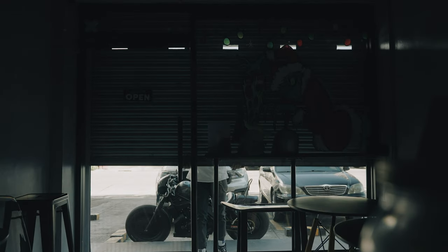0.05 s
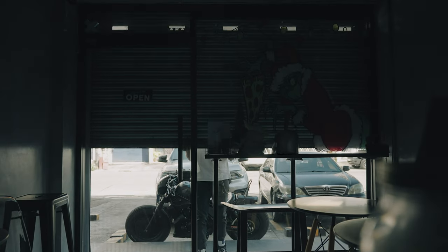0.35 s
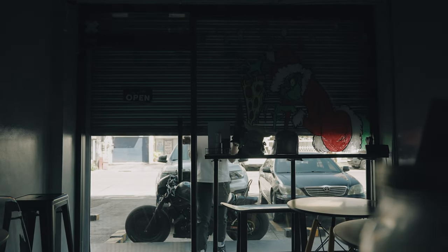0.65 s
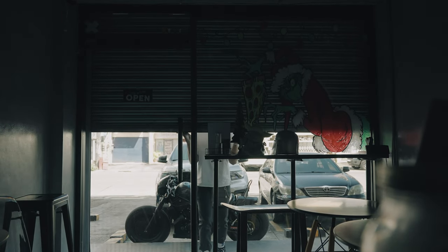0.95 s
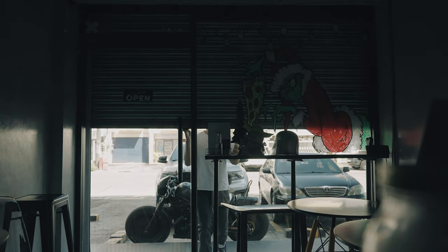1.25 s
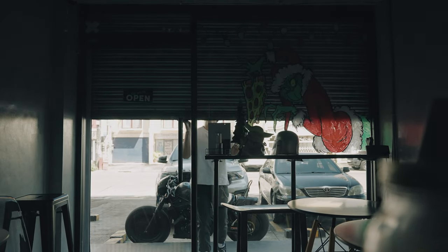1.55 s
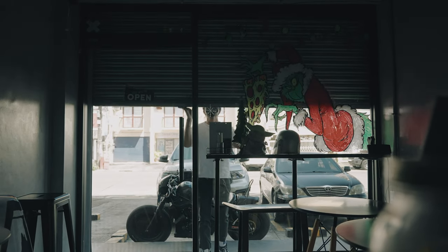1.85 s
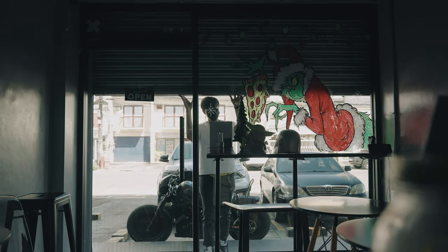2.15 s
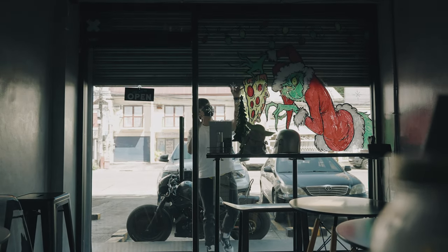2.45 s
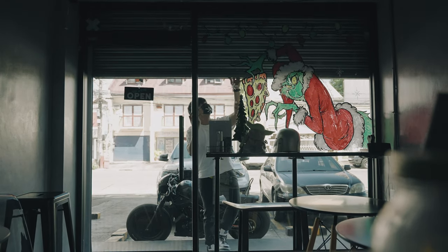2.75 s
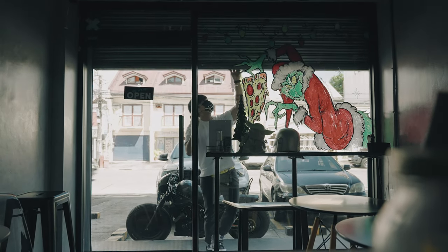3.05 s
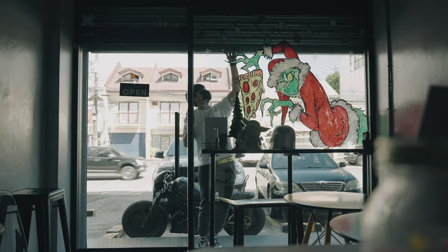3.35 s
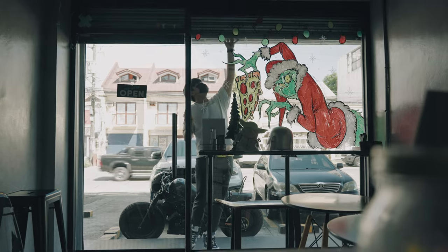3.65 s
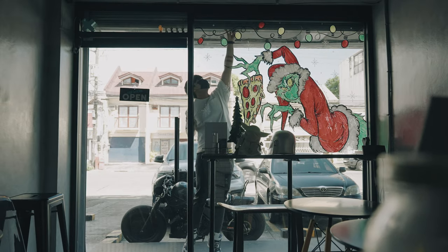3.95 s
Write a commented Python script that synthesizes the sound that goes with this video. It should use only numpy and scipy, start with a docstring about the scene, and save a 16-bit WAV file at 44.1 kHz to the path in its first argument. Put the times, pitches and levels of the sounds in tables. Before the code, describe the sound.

A metal roller shutter rises with a loud rattle, quietens, then clatters upward again in several shoves, scraping in its rails with low thumps and short squeaks. The small shop adds a short echo, and distant traffic hums faintly.

```python
"""A steel roller shutter is pushed up in surges, heard from inside a small hard-walled shop.
Its loose slats chatter and ring in dense tiny contacts and clash when jolted; their ends
scrape and squeak in the guide rails. For low end, the drum rumbles and the curtain drones
and thumps as it flexes. Behind it all sits a faint bed of street traffic and engine hum."""
import sys
import numpy as np
from scipy import signal
from scipy.fft import rfft, irfft, next_fast_len
from scipy.io import wavfile
from scipy.ndimage import map_coordinates

SR = 44100
rng = np.random.default_rng(int(sys.argv[2]) if len(sys.argv) > 2 else 0)


def master_out(mix):
    """Clip the mix to full scale and print it as 16-bit PCM to the path in sys.argv[1]."""
    frames = np.transpose(np.atleast_2d(mix))
    ceiling = np.clip(frames, -1, 1)
    pcm = np.round(ceiling * 32767).astype(np.int16)
    wavfile.write(sys.argv[1], SR, pcm)


N = 176400

# surges of the push, ahead of the trims (t/s, level/dB, scrape offset/dB)
PUSH_ENVELOPE = [(0.0, -24.5, 1), (0.17, -27.5, -9), (0.22, -25, -2.5), (0.6, -27.5, -7.5),
                 (0.75, -36.5, -22), (0.82, -33.5, -5), (1.1, -35, -11), (1.25, -44, -29), (1.32, -48, -12),
                 (1.46, -39, -13), (1.51, -42.5, -22), (1.57, -37.5, -7), (1.68, -34.5, -15),
                 (1.71, -39.5, -9), (1.84, -31.5, -5), (1.88, -25.5, -5), (1.96, -25.5, -7),
                 (2.07, -26, -4), (2.23, -29.5, -10.5), (2.38, -33, -4.5), (2.48, -26.5, -9),
                 (2.63, -30.5, -7.5), (2.75, -41.5, -25), (2.99, -33.5, -13), (3.23, -36, -10),
                 (3.26, -40.5, -13), (3.29, -31, -6), (3.44, -30.5, -12), (3.56, -38.5, -21),
                 (3.6, -32.5, -9), (3.72, -37.5, -23), (3.75, -34.5, -12), (3.94, -46, -18),
                 (4.0, -37.5, -4)]
# swell of the rumble, ahead of its trim (t/s, level/dB)
RUMBLE_ENVELOPE = [(0.0, -23.5), (0.32, -27.5), (0.37, -21.5), (0.49, -32), (0.53, -26.5), (0.71, -39.5),
                   (1.06, -35.5), (1.26, -43), (1.6, -32.5), (1.75, -38), (1.85, -36), (1.89, -25.5),
                   (2.07, -27), (2.09, -32.5), (2.19, -29.5), (2.25, -34.5), (2.35, -34), (2.38, -37),
                   (2.53, -29), (2.75, -43), (2.87, -35.5), (3.12, -36), (3.13, -33), (3.17, -38),
                   (3.42, -30), (3.49, -35.5), (3.69, -32), (3.95, -39.5), (3.98, -32), (4.0, -36)]
# jolts through the slats, ahead of their trim (t/s, level/dB, treble tilt/dB per octave)
CLASH_CUES = [(.005, -29, -3), (.185, -30.5, 9), (.222, -26.5, -2), (.34, -28.5, 2.5), (.765, -39.5, 0.5),
              (.815, -37.5, 1), (1.376, -46, -5), (1.533, -46.5, 7), (1.575, -38, -2), (1.732, -41, 6),
              (1.84, -29, 1), (1.875, -25, -0.5), (2.039, -26.5, -0.5), (2.44, -34, -4), (2.79, -35.5, -2),
              (2.934, -33, -0.5), (2.99, -33.5, -0.5), (3.11, -32.5, -1.5), (3.281, -24.5, -3),
              (3.305, -34, 2), (3.395, -33, 1), (3.415, -33, -1), (3.585, -40.5, 5), (3.74, -46, -1),
              (3.963, -43, 1)]
# slat ends sticking in the rails (t/s, length/s, f/Hz, level/dB, pitch jitter/ratio, octave level/dB)
SQUEAK_CUES = [(0.445, 0.056, 6500, -34, 0.021, -8), (1.996, 0.12, 8260, -40, .012, -25),
               (3.19, 0.047, 6140, -41.5, .01, -10), (3.736, 0.06, 5250, -44, .04, -5)]
# flexes of the curtain (t/s, level/dB)
THUMP_CUES = [(.345, -25), (1.389, -30), (1.575, -30), (1.885, -30), (2.509, -29), (3.13, -31.5),
              (3.965, -34)]
# engines in the street (start/s, end/s, f/Hz, level/dB)
ENGINE_CUES = [(0.898, 1.55, 73, -52.5), (2.943, 3.85, 53.8, -52)]

# tone colour of each layer (f/Hz, level/dB)
RATTLE_EQ = [(150, -22), (330, -2), (500, -0.5), (900, -2.5), (1350, -0.5), (2100, 1), (3000, -2),
             (4300, -11.5), (7000, -13.5), (15500, -32)]
SCRAPE_EQ = [(1500, -40), (3500, -0.5), (4700, -4), (6300, -3), (8500, -8), (11000, -7.5), (15500, -17)]
CLASH_EQ = [(100, -25), (400, -16), (1000, -6.5), (2100, -4.5), (3300, -8), (4600, -12.5), (6500, -11.5),
            (10000, -17.5), (15500, -26)]
DRUM_EQ = [(25, -42), (60, -20), (90, -14.5), (122, -1.5), (200, -0.5), (300, -1.5), (380, -6.5),
           (520, -13.5), (1000, -31), (3000, -70)]
THUMP_EQ = [(30, -45), (80, -10), (125, -3.5), (250, -0.5), (400, -17), (1000, -50), (3000, -80)]
STREET_EQ = [(20, -16), (60, 0), (150, -7), (400, -6.5), (1500, -3), (5000, -52), (15000, -65)]
# metallic ring of the slats (f/Hz, width/Hz, level/dB)
SLAT_MODES = [(678, 18, -14), (746, 33, -3.5), (1199, 26, 1.5), (1374, 11, 2), (1756, 20, -1.5),
              (1817, 52, -1.5), (1982, 58, 4.5), (2407, 61, 1), (2789, 28, -8), (3580, 71, -6)]
# low resonances of the curtain (f/Hz, width/Hz, level/dB)
CURTAIN_MODES = [(203, 18.4, -10.5), (253, 10.4, -2.5), (278.7, 31.5, -4), (433.8, 21, -13.5)]

# reverb time of the shop (f/Hz, T60/s)
SHOP_DECAY = [(150, 0.53), (1000, 0.4), (4000, 0.46), (12000, 0.26)]
# likeness of left and right (f/Hz, likeness/ratio: 0 is wide, 1 and above is mono)
STEREO_LIKENESS = [(60, 4.3), (125, 1.9), (250, 1.2), (500, 0.76), (1000, 0.71), (2000, 0.26),
                   (12000, 0.01)]
# stereo balance (f/Hz, left minus right/dB)
STEREO_BALANCE = [(200, 0), (1500, -0.39), (4000, -0.64), (8000, -2.5), (12000, -0.39)]

RATTLE_TRIM_DB, SCRAPE_TRIM_DB, CLASH_TRIM_DB, RUMBLE_TRIM_DB = 1.5, -1.5, 3, -2.5
RATTLE_PER_S, SCRAPE_PER_S, CLASH_PER_S = 2000, 1700, 3400  # contact density
RING_DB, DRONE_DB, STREET_DB = -7, -37, -44.5
DRONE_FOLLOW = 0.77  # dB of drone per dB of rumble
CLASH_ATTACK_S, CLASH_T60_S = 0.0015, 0.26
SQUEAK_EDGE_S, SQUEAK_FADE_DB = 0.0022, 0.5
THUMP_ATTACK_S, THUMP_T60_S = 0.0098, 0.23
LEFT_LAG_S, HIGH_CUT_HZ = 3.6 / SR, 15800


def rattle():
    """Loose slats chatter against each other and ring."""
    taps = shop_reverb(contacts(RATTLE_PER_S, spread_db=3.5), direct_db=-3.5, spots=8)
    chatter = stereo(taps, eq(RATTLE_EQ))
    ring = stereo(contacts(RATTLE_PER_S, spread_db=0), resonances(SLAT_MODES))
    return chatter + amp(RING_DB) * ring


def scrape():
    """Slat ends grate along the guide rails in fine, bright ticks."""
    ticks = shop_reverb(contacts(SCRAPE_PER_S, spread_db=3.5), direct_db=-7.5, spots=8)
    return stereo(ticks, eq(SCRAPE_EQ))


def clashes():
    """Each jolt runs through the slats as a dying burst of contacts."""
    out, t = np.zeros((2, N)), np.arange(SR // 2) / SR
    for start, db, tilt_db in CLASH_CUES:
        colour = lambda hz: amp(at_hz(CLASH_EQ, hz) + tilt_db * np.log2(hz / 1000 + 1))
        burst = stereo(contacts(CLASH_PER_S, spread_db=2.5, size=len(t)), colour)
        envelope = hit_envelope(t, CLASH_ATTACK_S, CLASH_T60_S)
        add(out, start, amp(db + CLASH_TRIM_DB) * envelope * burst)
    return shop_reverb(out, direct_db=2.5, spots=1)


def squeaks():
    """Steel sticks and slips on steel: a short, unsteady whistle with its octave."""
    out = np.zeros((2, N))
    for start, length, hz, db, jitter, octave_db in SQUEAK_CUES:
        t = np.arange(int(length * SR)) / SR
        phase = wavering_phase(hz, len(t), depth=jitter, turns_per_s=890)
        tone = np.sqrt(2) * (np.sin(phase) + amp(octave_db) * np.sin(2 * phase))
        edges = np.minimum(1, np.minimum(t, length - t) / SQUEAK_EDGE_S)
        add(out, start, amp(db - SQUEAK_FADE_DB * t / length) * edges * tone)
    return shop_reverb(out, direct_db=-1, spots=1)


def rumble():
    """The drum rolls, and the curtain drones in its resonances with gentler swells."""
    level_db, = automation(RUMBLE_ENVELOPE)
    drone = stereo(rng.standard_normal((2, N)), resonances(CURTAIN_MODES))
    drone_db = DRONE_DB + DRONE_FOLLOW * (level_db - level_db.mean())
    return amp(level_db + RUMBLE_TRIM_DB) * noise(DRUM_EQ) + amp(drone_db) * drone


def thumps():
    """The whole curtain flexes with a low boom."""
    out, t = np.zeros((2, N)), np.arange(SR // 2) / SR
    envelope = hit_envelope(t, THUMP_ATTACK_S, THUMP_T60_S)
    for start, db in THUMP_CUES:
        add(out, start, amp(db) * envelope * noise(THUMP_EQ, size=len(t)))
    return out


def street():
    """A bed of distant traffic, with engine notes that swell and fade."""
    out = amp(STREET_DB) * noise(STREET_EQ)
    for start, end, hz, db in ENGINE_CUES:
        size = int((end - start) * SR)
        hum = np.sqrt(2) * np.sin(wavering_phase(hz, size, depth=0.026, turns_per_s=11.5))
        add(out, start, amp(db) * signal.windows.tukey(size, 0.5) * hum)
    return out


def shop_reverb(x, direct_db, spots):
    """Direct sound plus reverb; x is scattered over spots on the curtain, each with its own tail."""
    spot = rng.integers(spots, size=N)
    wet = sum(signal.fftconvolve(x * (spot == k), shop_tail(), axes=1)[:, :N] for k in range(spots))
    return (amp(direct_db) * x + wet) / np.hypot(1, amp(direct_db))


def shop_tail():
    """The hard walls answer with a short, diffuse tail whose top end dies first."""
    hz, t, spectrum = signal.stft(rng.standard_normal((2, SR // 2)), SR, nperseg=256)
    decay = amp(-60 * t / at_hz(SHOP_DECAY, hz)[:, None])
    tail = signal.istft(spectrum * decay, SR, nperseg=256)[1]
    return tail / np.linalg.norm(tail[0])


def contacts(per_s, spread_db, size=N):
    """Tiny impacts at random moments, with random polarity in each of two channels."""
    hits = rng.random(size) < per_s / SR
    strength = amp(spread_db * np.clip(rng.standard_normal(size), -2, 2))
    return hits * strength * rng.choice([-1, 1], (2, size))


def noise(colour, size=N):
    """Stereo noise shaped by an EQ table."""
    return stereo(rng.standard_normal((2, size)), eq(colour))


def wavering_phase(hz, size, depth, turns_per_s):
    """Phase of a tone whose pitch wanders smoothly around hz."""
    knots = rng.standard_normal(int(N * turns_per_s / SR) + 4)
    wander = map_coordinates(knots, [np.arange(size) * turns_per_s / SR])
    return 2 * np.pi * np.cumsum(hz * (1 + depth * wander)) / SR


def hit_envelope(t, attack_s, t60_s):
    """A quick rise and an exponential decay."""
    return (1 - np.exp(-t / attack_s)) * amp(-60 * t / t60_s)


def automation(table):
    """One per-sample curve for each column after the time."""
    times, *columns = np.transpose(table)
    return [np.interp(np.arange(N) / SR, times, column) for column in columns]


def stereo(pair, colour):
    """Colour two unrelated signals and blend them to stereo at rms 1: bass centred, treble wide."""
    def response(hz):
        width = np.arccos(np.clip(at_hz(STEREO_LIKENESS, hz), -1, 1)) / 2
        return colour(hz) * np.array([np.cos(width), np.sin(width)])
    mid, side = filtered(pair, response)
    out = np.array([mid + side, mid - side])
    return out / np.sqrt(np.mean(out ** 2) + 1e-20)


def resonances(modes):
    """Response of a bank of band-pass modes with alternating polarity."""
    def response(hz):
        total = 0
        for k, (centre, width, db) in enumerate(modes):
            peak = 1j * hz * width / (centre ** 2 - hz ** 2 + 1j * hz * width)
            total += (-1) ** k * amp(db) / np.sqrt(width) * peak
        return total
    return response


def eq(table):
    """Frequency response of an EQ table."""
    return lambda hz: amp(at_hz(table, hz))


def filtered(x, response):
    """Pass x through a frequency response."""
    size = x.shape[-1]
    padded = next_fast_len(size + 8192)
    hz = np.fft.rfftfreq(padded, 1 / SR)
    return irfft(rfft(x, padded) * response(hz), padded)[..., :size]


def at_hz(table, hz):
    """Read a table along a log frequency axis."""
    freqs, values = np.transpose(table)
    return np.interp(np.log(hz + 1), np.log(freqs + 1), values)


def add(out, start, x):
    """Mix a mono or stereo x into out from start, in seconds."""
    first = round(start * SR)
    size = min(x.shape[-1], N - first)
    out[:, first:first + size] += x[..., :size]


def amp(db):
    """Decibels to gain."""
    return 10 ** (np.asarray(db) / 20)


def scene():
    """The push drives rattle and scrape; accents ride on top, rumble and street lie beneath."""
    push_db, scrape_db = automation(PUSH_ENVELOPE)
    slats = amp(RATTLE_TRIM_DB) * rattle() + amp(scrape_db + SCRAPE_TRIM_DB) * scrape()
    return amp(push_db) * slats + rumble() + clashes() + thumps() + squeaks() + street()


def record(dry):
    """Lean the mix slightly right, a touch earlier and brighter there, and cut the extreme top."""
    def response(hz):
        split = np.array([[0.5], [-0.5]])  # half to each side, in opposite directions
        balance = amp(at_hz(STEREO_BALANCE, hz) * split)
        delay = np.exp(-2j * np.pi * hz * LEFT_LAG_S * split)
        return balance * delay * (hz < HIGH_CUT_HZ)
    return filtered(dry, response)


dry = scene()
out = record(dry)
master_out(out)
```